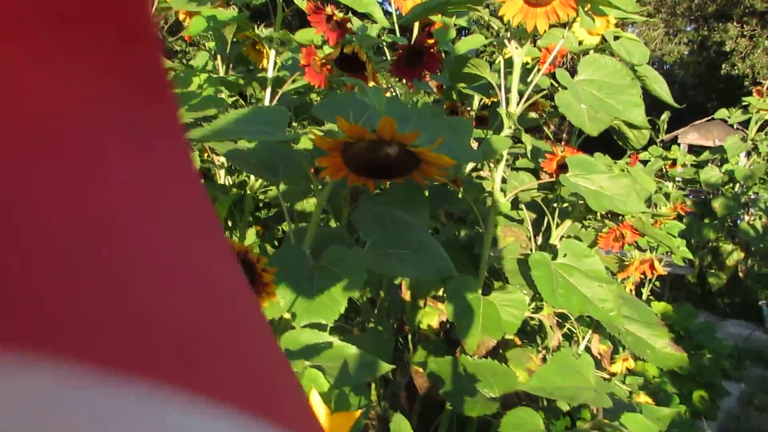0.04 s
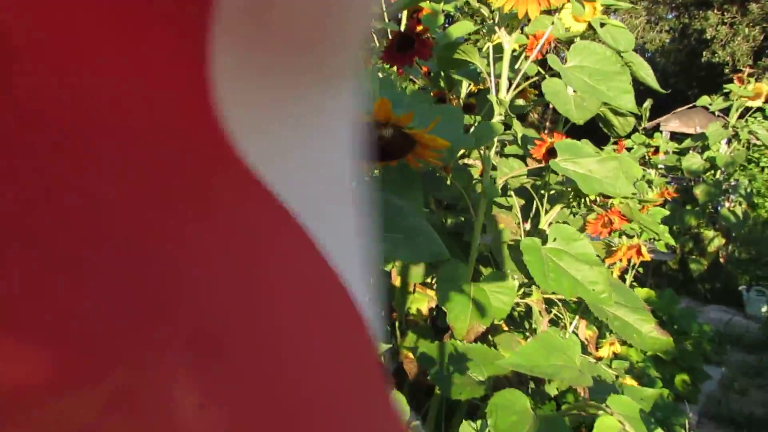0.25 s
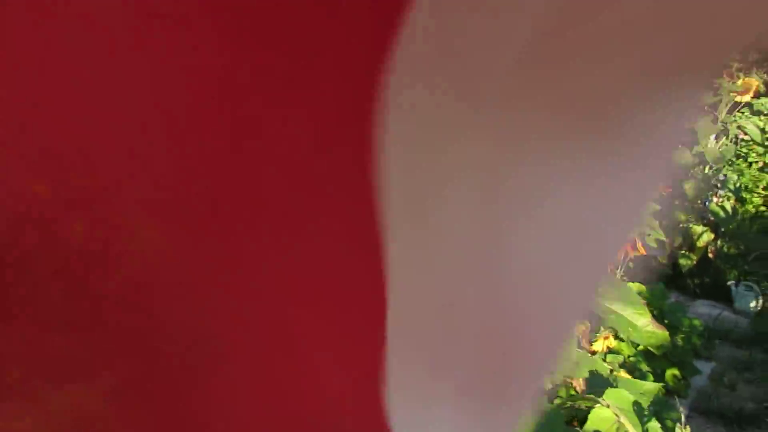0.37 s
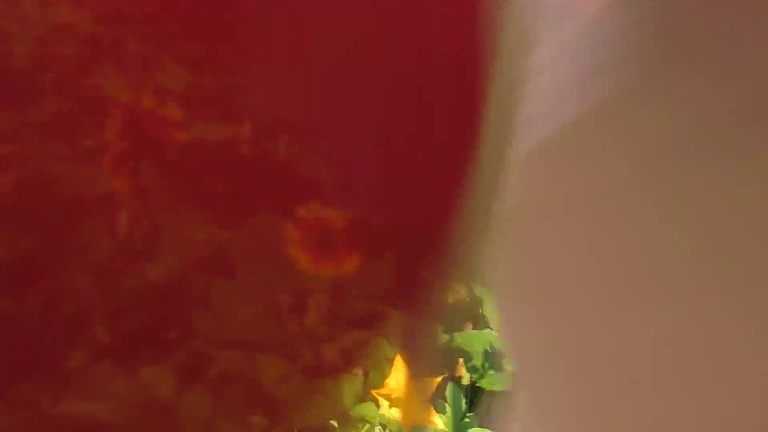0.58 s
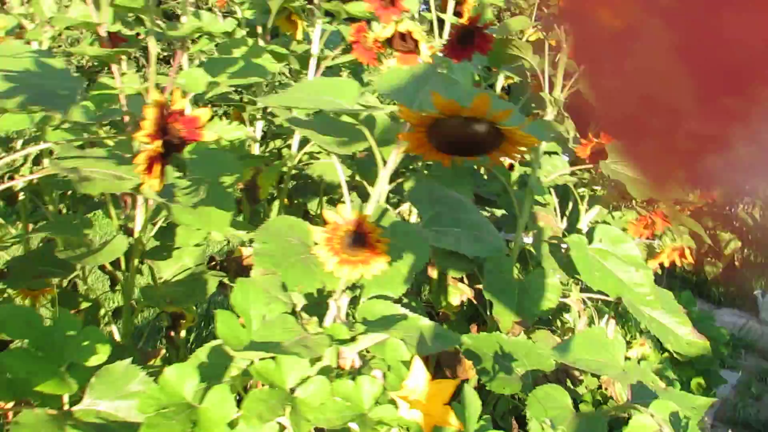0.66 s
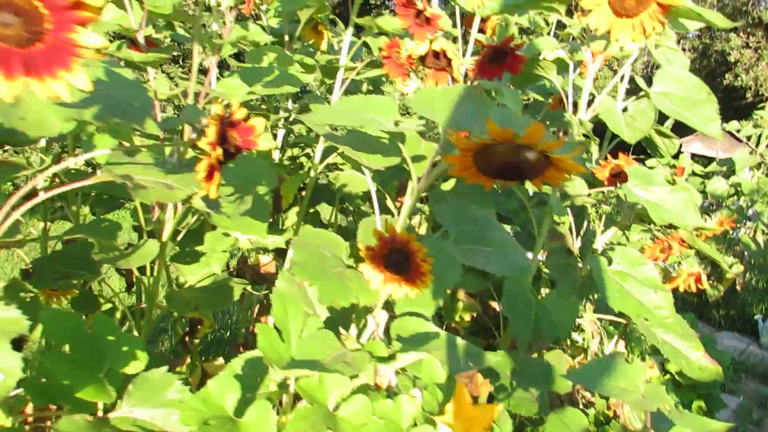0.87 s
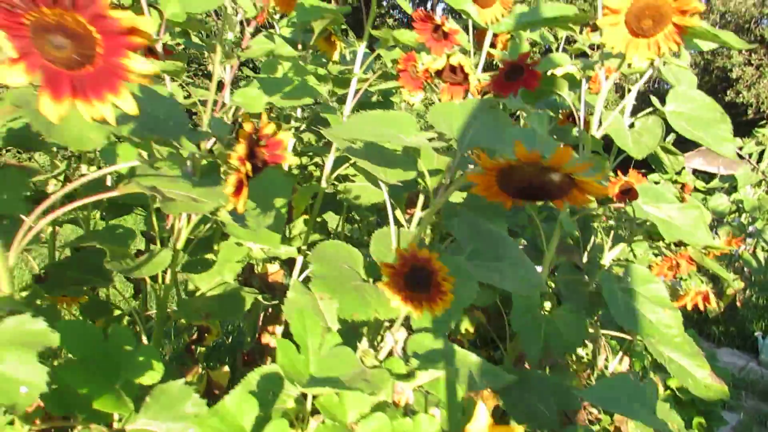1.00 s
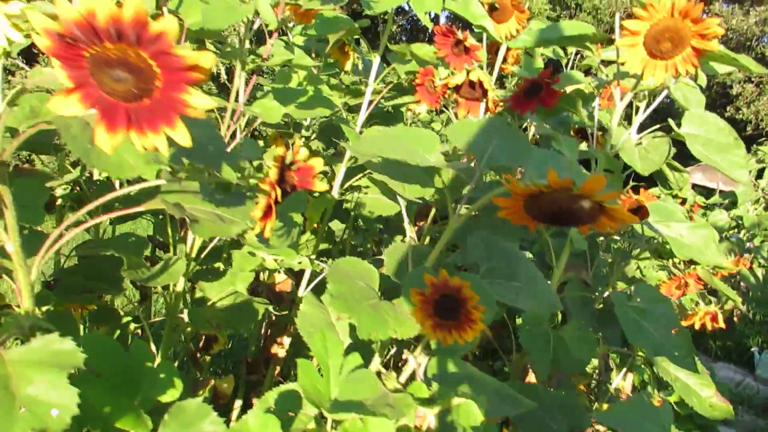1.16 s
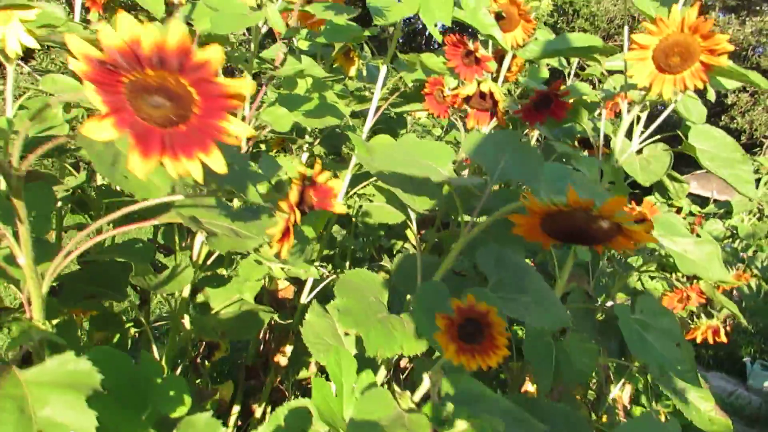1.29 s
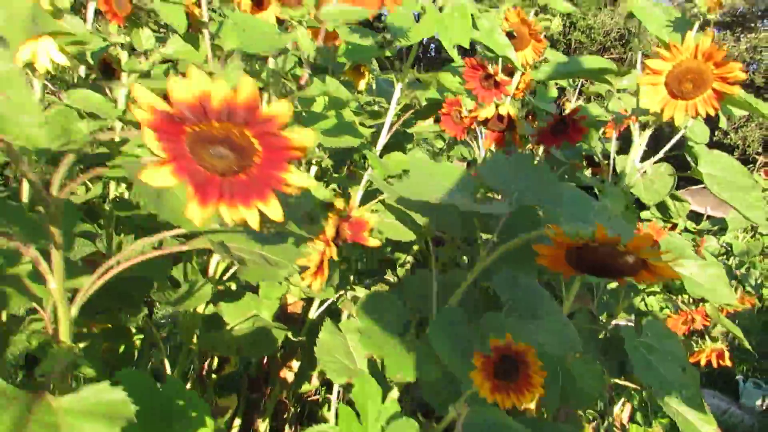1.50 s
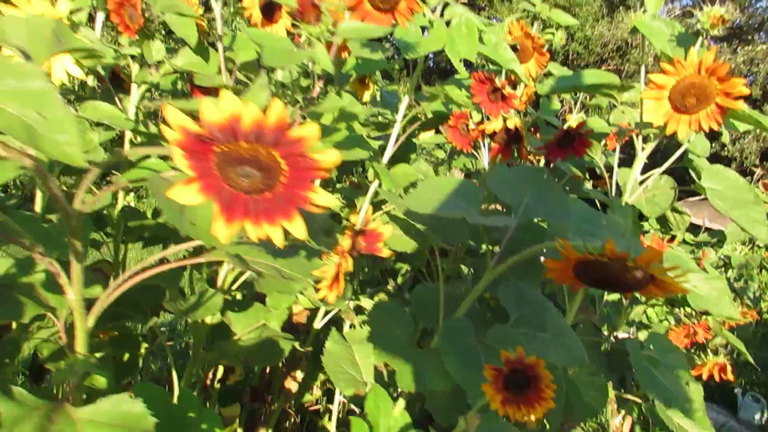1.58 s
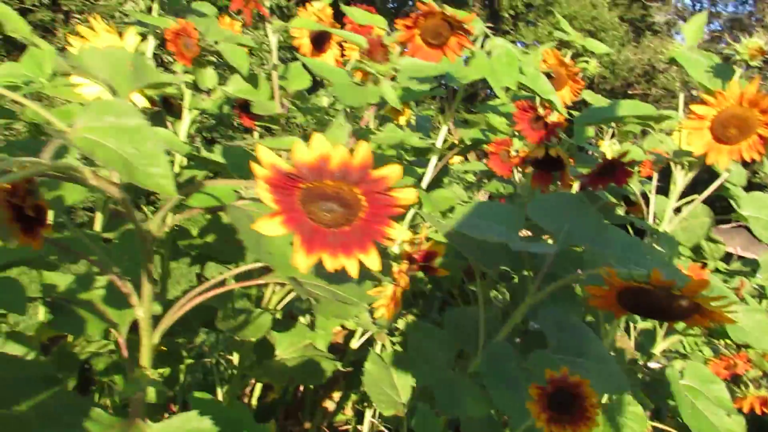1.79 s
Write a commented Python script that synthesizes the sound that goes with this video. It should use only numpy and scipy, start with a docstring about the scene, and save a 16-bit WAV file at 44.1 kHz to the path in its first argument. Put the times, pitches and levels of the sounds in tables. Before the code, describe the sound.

A flag rubs against the microphone, swelling into loud, hollow scraping with sharp snaps and low thumps of air from about 0.3 to 0.7 seconds, mostly on the left. By 0.8 seconds it lets go, leaving a quiet garden with faint, thin bird calls and a high pulsing insect. Two small dry clacks come around 1.4 seconds, and leaves brush faintly over a soft distant rumble.

```python
"""A sunny garden, where a flag blows against a camera. The cloth drags over the two microphone ports,
left then right, scraping, snapping taut and pushing air into them. When it lets go, the quiet garden
slowly comes up: a pulsing insect, a few thin bird calls, a brush of leaves and two small dry clacks."""
import sys
import numpy as np
from scipy import signal
from scipy.fft import rfft, irfft
from scipy.io import wavfile

SR = 44100
rng = np.random.default_rng(int(sys.argv[2]) if len(sys.argv) > 2 else 0)


def to_wav(s):
    """Save 16-bit WAV."""
    ch = np.atleast_2d(s).T  # columns
    pcm = np.round(np.clip(ch, -1, 1) * 32767)  # PCM
    wavfile.write(sys.argv[1], SR, pcm.astype(np.int16))


N = 81585
T = np.arange(N) / SR
HZ = np.fft.rfftfreq(N, 1 / SR)

# The hollow housing and the bright weave. Each row: frequency in Hz, relative level in dB.
HOLLOW_TONE = [(30, -39.5), (100, -21), (170, -18.5), (300, -4), (580, 1.5), (800, -2.5), (1200, -10.5),
               (2200, -27), (4000, -35.5), (16000, -65)]
WEAVE_TONE = [(100, -29.5), (800, -8), (1600, 7.5), (3000, 1.5), (5000, -2), (8000, -7), (11000, -13),
              (15500, -26.5)]
# Stereo image of the ports, under cloth and in open air.
# Each row: frequency in Hz, likeness from 0 to 1, left phase lead in radians.
COVERED_PORTS = [(80.1, 0.95, -0.5), (164, 0.6, 0.3), (300, 1, 2.5), (715, .94, 3), (1480, 0.86, 4),
                 (2920, 0.9, 5), (5500, 0.7, 6.5), (12000, 1, 4.5)]
OPEN_PORTS = [(100, 1, 0.00039), (400, 0.8, 0.0012), (1000, 0.6, 0), (5970, 0.4, 0.0024)]


def amp(db):
    """Decibels to gain."""
    return 10 ** (np.asarray(db) / 20)


def unit(x):
    """Scales to an rms of one."""
    return x / np.sqrt(np.mean(x ** 2) + 1e-20)


def curve(table):
    """The columns of a time table, sample by sample."""
    times, *columns = np.transpose(table)
    return [np.interp(T, times, column) for column in columns]


def spectrum(table):
    """The columns of a frequency table, bin by bin."""
    hz, *columns = np.transpose(table)
    return [np.interp(np.log(HZ + 1), np.log(hz), column) for column in columns]


def during(table):
    """A gate with 5 ms fades, open from a time table's first row to its last."""
    return np.clip((T - table[0][0]) / .005, 0, 1) * np.clip((table[-1][0] - T) / .005, 0, 1)


def swells(table):
    """Soft bell-shaped swells of level."""
    return sum(amp(db) * np.cos(np.pi / 2 * np.clip((T - centre) / half, -1, 1)) ** 2
               for centre, half, db in table)


def wander(rate_hz):
    """Smooth random drift with an rms of one."""
    return unit(irfft(rfft(rng.standard_normal(N)) / (1 + (HZ / rate_hz) ** 4), N))


def pan(db):
    """Constant-power gains, the left louder than the right by db."""
    gains = amp(np.array([[.5], [-.5]]) * db)
    return gains / np.sqrt((gains ** 2).mean(0))


def grains(per_s, spread_db, wash):
    """Two trains of tiny slips of uneven size over a smooth wash."""
    size = amp(spread_db * np.minimum(rng.exponential(1, (2, N)), 4))
    slips = size * rng.choice([-1, 1], (2, N)) * (rng.random((2, N)) < per_s / SR)
    return unit(slips) + wash * rng.standard_normal((2, N))


def texture(tone, ports, drive=None):
    """Colours a drive (white noise if none) and spreads it over the two ports, at an rms of one."""
    left, unrelated = rfft(rng.standard_normal((2, N)) if drive is None else drive)
    likeness, lead = spectrum(ports)
    likeness = np.clip(likeness, 0, 1)
    right = (likeness * left + np.sqrt(1 - likeness ** 2) * unrelated) * np.exp(-1j * lead)
    return unit(irfft(np.array([left, right]) * amp(spectrum(tone)[0]), N))


def hiss():
    """A fine high background hiss, steady at first, dropping away as the loud rubbing starts."""
    # Its fader. Each row: time in seconds, level in dB.
    levels = [(0, -52), (.33, -51), (.4, -79), (.72, -66), (.75, -70.5), (.83, -100)]
    # Its colour. Each row: frequency in Hz, relative level in dB.
    tone = [(300, -15.5), (2500, -4), (4500, -4.5), (7500, 1), (8400, 6), (9300, 7), (10200, -8.5),
            (12500, -3.5), (15500, -17)]
    return texture(tone, OPEN_PORTS) * amp(curve(levels)[0])


def garden():
    """A bed of distant rumble, with leaves brushing now and then."""
    # Colour of each layer. Each row: frequency in Hz, relative level in dB.
    rumble_tone = [(20, -22), (45, -5.5), (75, -0.5), (130, -5), (210, -1.5), (450, -10), (800, -17.5),
                   (2200, -28), (2950, -28), (3700, -32), (7000, -34), (15500, -46.5)]
    leaf_tone = [(300, -12.5), (2000, 0.5), (9000, -1.5), (15500, -13.5)]
    # The bed's fader. Each row: time in seconds, level in dB.
    rumble_levels = [(0, -45), (.34, -34), (.45, -62), (.9, -64), (1.1, -62.5), (1.3, -57.5), (1.6, -57),
                     (1.85, -54.5)]
    # Leaf brushes. Each row: centre in seconds, half length in seconds, level in dB.
    brushes = [(1.128, 0.11, -73), (1.724, 0.036, -66.5), (1.824, 0.1, -70.5)]
    leaves = texture(leaf_tone, OPEN_PORTS, grains(per_s=3000, spread_db=3.5, wash=.8))
    rumble = texture(rumble_tone, OPEN_PORTS) * amp(curve(rumble_levels)[0] + .37 * wander(rate_hz=12))
    return rumble + swells(brushes) * leaves


def insect():
    """One insect pulses in short sagging chirps over a distant chorus."""
    # The buzz creeping up. Each row: time in seconds, relative level in dB.
    buzz_levels = [(.7, -82), (1, -77), (1.25, -74), (1.85, -69)]
    # The chorus's narrow band. Each row: frequency in Hz, relative level in dB.
    chorus_tone = [(3500, -40.5), (5300, -5), (6400, -1.5), (7000, -5), (8200, -31.5)]
    pitch_hz, sag_hz, chirps_per_s, chirp_centre_s = 6450, 450, 19.7, 1.185
    cycle = ((T - chirp_centre_s) * chirps_per_s + .5) % 1 - .5
    hz = pitch_hz - sag_hz * cycle + 110 * wander(rate_hz=500)
    chirps = np.cos(np.pi * cycle) ** 4 * np.sin(2 * np.pi * np.cumsum(hz) / SR)
    chorus = texture(chorus_tone, OPEN_PORTS)
    return amp(curve(buzz_levels)[0]) * (amp(-1) * chirps + amp(-3.5) * chorus)


def bird():
    """Thin gliding notes, blurred by distance, with faint one-pitch whistles between the first ones."""
    # Calls. Each row: start and length in seconds, first and last pitch in Hz, level in dB.
    notes = [(0.798, 0.021, 3300, 3220, -66.5), (0.893, .046, 4100, 2850, -74.5),
             (0.991, 0.052, 4200, 2750, -73), (1.105, 0.051, 3880, 2750, -70.5),
             (1.652, 0.043, 5550, 5130, -66.5), (1.689, 0.052, 2640, 2280, -68.5),
             (1.743, 0.027, 4380, 4850, -67.5)]
    # Whistles. Each row: centre in seconds, half length in seconds, level in dB.
    whistles = [(.87, 0.027, -79.5), (.967, 0.035, -75), (1.07, 0.046, -76)]
    out = np.zeros(N)
    for start, length, from_hz, to_hz, db in notes:
        progress = np.clip((T - start) / length, 0, 1)
        hz = from_hz + (to_hz - from_hz) * progress + 150 * wander(rate_hz=500)
        arch = np.sqrt(4 * progress * (1 - progress))
        out += amp(db) * arch * np.sin(2 * np.pi * np.cumsum(hz) / SR)
    whistle_hz = 2980 + 100 * wander(rate_hz=500)
    return out + swells(whistles) * np.sin(2 * np.pi * np.cumsum(whistle_hz) / SR)


def knock(centre_hz):
    """A small hard thing struck once: modes near the centre ring loudest."""
    # Its modes. Each row: frequency in Hz, relative level in dB, seconds to fall 60 dB.
    modes = [(398, 2, .04), (743, -3.5, 0.018), (985, -14.5, 0.021), (1143, -4, 0.031), (1307, -4.5, 0.027),
             (1519, -9.5, 0.077), (1764, -5, 0.02), (1887, -9, 0.022), (2620, -5, 0.026),
             (2930, -10.5, 0.017), (3690, -15, 0.014), (4600, -20.5, 0.03)]
    fall_db_per_octave, attack_s = 11.5, .00058
    t = np.arange(SR // 5) / SR
    hz, db, t60 = np.transpose(modes)[:, :, None]
    strength = amp(db - fall_db_per_octave * abs(np.log2(hz / centre_hz)))
    decay = np.exp(-np.log(1000) * t / t60)
    partials = strength * decay * np.sin(2 * np.pi * (hz * t + rng.random(hz.shape)))
    return partials.sum(0) * np.minimum(t / attack_s, 1)


def clacks():
    """Two double knocks with a soft rattle between them, and a short scatter from the garden."""
    # Knocks. Each row: start in seconds, relative level in dB, most excited frequency in Hz.
    hits = [(1.3421, -33, 1670), (1.3439, -31.5, 2620), (1.441, -29.5, 1310), (1.446, -36.5, 1900)]
    # Swells of rattle. Each row: centre in seconds, half length in seconds, level in dB.
    rattles = [(1.414, 0.016, -59), (1.42, .045, -61.5)]
    echo_db, echo_t60_s = -7, .08
    ticks = grains(per_s=900, spread_db=2, wash=0)[0]
    direct = swells(rattles) * unit(signal.fftconvolve(ticks, knock(centre_hz=1740))[:N])
    for start, db, centre_hz in hits:
        hit = amp(db) * knock(centre_hz)
        slot = direct[round(start * SR):][:len(hit)]
        slot += hit[:len(slot)]
    tail = rng.standard_normal((2, N)) * np.exp(-np.log(1000) * T / echo_t60_s)
    echo = signal.fftconvolve(direct[None], tail / np.linalg.norm(tail[0]), axes=1)[:, :N]
    return direct + amp(echo_db) * echo


def buffeting():
    """Air pushed into the ports makes a low, gusty rumble."""
    # Gusts. Each row: time in seconds, relative level in dB.
    gusts = [(0, -74), (.09, -40.5), (.22, -44), (.285, -36.5), (.305, -19.5), (.325, -20), (.342, -20.5),
             (.38, -28.5), (.41, -44), (.46, -54.5), (.495, -40.5), (.511, -31), (.535, -36.5), (.65, -34),
             (.688, -21.5), (.72, -23.5), (.755, -42), (.78, -56)]
    # Their bass weight. Each row: frequency in Hz, relative level in dB.
    gust_tone = [(15, -42.5), (45, -22), (75, -5.5), (115, -5), (170, -5), (300, -11), (2000, -80)]
    # Their image. Each row: frequency in Hz, likeness from 0 to 1, left phase lead in radians.
    pushed_ports = [(80, .995, 0), (130, .9, .3), (300, .85, 1.6)]
    trim_db = -1
    return texture(gust_tone, pushed_ports) * amp(trim_db + curve(gusts)[0]) * pan(db=-3) * during(gusts)


def shoves():
    """Each billow of the cloth pushes the air once and pulls it back, alike in both ports."""
    # Billows. Each row: centre in seconds, pitch in Hz, envelope level in dB.
    billows = [(0.324, 70, -14), (.353, 62.6, -18), (.377, 70, -20), (0.513, 100, -25.5),
               (0.691, 120, -18.5), (.711, 89.7, -19.5), (.735, 125.3, -26), (1.012, 65, -53.5)]
    width_cycles = .42
    out = np.zeros(N)
    for centre, hz, db in billows:
        cycles = hz * (centre - T)
        out += amp(db) * np.sin(2 * np.pi * cycles) * np.exp(-.5 * (cycles / width_cycles) ** 2)
    return out


def air_pocket():
    """The air caught between cloth and camera gives a wavering hum."""
    # The hum's path. Each row: time in seconds, pitch in Hz, level in dB.
    path = [(.2, 280, -33), (.24, 300.5, -23), (.275, 344.4, -17.5), (.302, 326.4, -19), (.322, 339, -25.5),
            (.336, 561, -20), (.348, 444, -20.5), (.36, 400, -33)]
    hz, db = curve(path)
    phase = 2 * np.pi * np.cumsum(hz * (1 + .06 * wander(rate_hz=90))) / SR
    hum = np.sin([phase, phase - 2])
    return hum * amp(db + 1.5 * wander(rate_hz=70)) * pan(db=2.5) * during(path)


def snaps():
    """Each fold snaps taut in a burst of thud and crack that starts at once and dies quickly."""
    # Folds. Each row: peak time in seconds, thud in dB, crack in dB, left over right in dB.
    folds = [(0.3592, -2.5, -28.5, 1.5), (0.3824, -17.5, -11, 22), (0.4326, -24, -22.5, 6.5),
             (0.4643, -16, -16.5, 21.5), (0.5283, -28.5, -20.5, 10.5), (0.661, -11.5, -27, 7.5),
             (0.6783, -11, -25, -4.5), (0.6901, -12, -23.5, -10), (0.7077, -10, -24.5, -2),
             (0.82, -65, -64, -4)]
    rise_s, fall_s = .0009, .0024
    thud, crack = texture(HOLLOW_TONE, COVERED_PORTS), texture(WEAVE_TONE, COVERED_PORTS)
    out = np.zeros((2, N))
    for peak, thud_db, crack_db, side_db in folds:
        burst = np.exp(-np.maximum((peak - T) / rise_s, (T - peak) / fall_s))
        out += burst * (amp(thud_db) * thud + amp(crack_db) * crack) * pan(side_db)
    return out


def cloth():
    """The weave sticks and slips: a hollow drag and a bright scrape on each port flutter together."""
    # The drag over the housing. Each row: time in seconds, relative level in dB, left over right in dB.
    drag = [(0, -41.5, 7.5), (.09, -27.5, 6.5), (.2, -29, 5.5), (.225, -25, 10), (.285, -26.5, 10),
            (.32, -16.5, 3.5), (.345, -17, 9.5), (.362, -9, 5), (.395, -15, 3), (.415, -11.5, 5),
            (.462, -15, 0.5), (.5, -29.5, 7.5), (.545, -15.5, 2.5), (.585, -21.5, 4), (.6, -18.5, 7),
            (.66, -14.5, 1.5), (.695, -17.5, 0.5), (.725, -23, -5), (.736, -27.5, -3.5), (.8, -77.5, -2)]
    # The scrape on each port. Each row: time in seconds, relative level in dB.
    left_scrape = [(.29, -47), (.312, -34.5), (.322, -21), (.34, -45.5), (.36, -21.5), (.42, -22),
                   (.465, -24), (.5, -44), (.523, -35), (.529, -21), (.555, -25.5), (.59, -33),
                   (.64, -24.5), (.669, -23.5), (.679, -52), (.722, -43.5), (.73, -50)]
    right_scrape = [(.6, -59), (.664, -39), (.677, -26), (.695, -31.5), (.724, -36), (.733, -50.5)]
    # The drag's upper resonances. Each row: frequency in Hz, relative level in dB.
    edge_tone = [(300, -32.5), (700, -5), (1000, 1), (1400, -2.5), (2100, -11), (3500, -21), (7000, -40.5),
                 (15000, -50)]
    drag_trim_db, scrape_trim_db = -3.5, -2
    edge_trim_db, edge_growth, firm_press_db = -5, .77, -15.5
    flutter_db = 1.3 * wander(rate_hz=170)
    drag_db, drag_side_db = curve(drag)
    hollow = texture(HOLLOW_TONE, COVERED_PORTS, grains(per_s=2500, spread_db=4.5, wash=.8))
    edge = texture(edge_tone, COVERED_PORTS, grains(per_s=4000, spread_db=3, wash=1))
    edge *= amp(edge_trim_db + edge_growth * (drag_db - firm_press_db))  # more pressure, more bite
    out = (hollow + edge) * amp(drag_trim_db + drag_db + flutter_db) * pan(drag_side_db) * during(drag)
    for levels, side in (left_scrape, pan(db=22.5)), (right_scrape, pan(db=-20.5)):
        scrape = texture(WEAVE_TONE, COVERED_PORTS, grains(per_s=6000, spread_db=3, wash=.46))
        out += scrape * amp(scrape_trim_db + curve(levels)[0] + flutter_db) * side * during(levels)
    return out


def scene():
    """The flag on the microphone, and the garden behind it."""
    return (cloth() + hiss() + snaps() + buffeting() + shoves() + air_pocket()
            + garden() + insect() + bird() + clacks())


def record(dry):
    """The microphone drops the deepest bass, clips any peak over full scale and cuts the highest treble."""
    low_cut_hz, high_cut_hz = 38, 15800
    highpass = signal.butter(2, low_cut_hz, "highpass", fs=SR, output="sos")
    lowpass = signal.firwin(511, high_cut_hz, window=("kaiser", 9), fs=SR)
    clipped = np.clip(signal.sosfilt(highpass, dry), -1, 1)
    return signal.oaconvolve(clipped, lowpass[None], "same")


dry = scene()
out = record(dry)
to_wav(out)
```